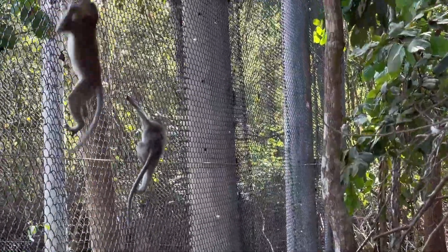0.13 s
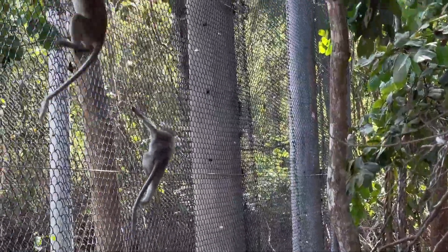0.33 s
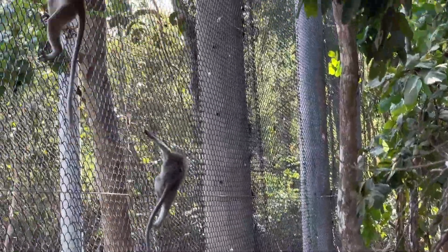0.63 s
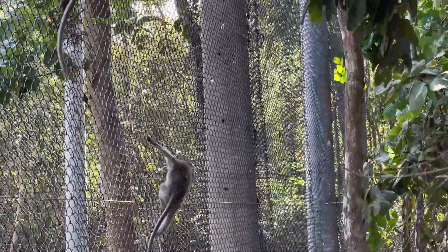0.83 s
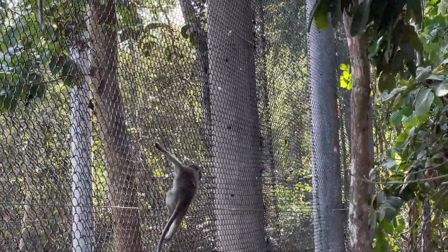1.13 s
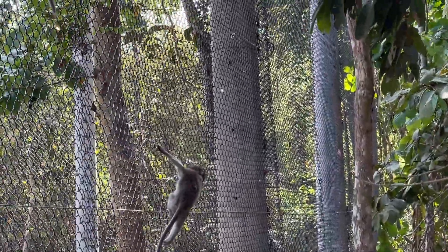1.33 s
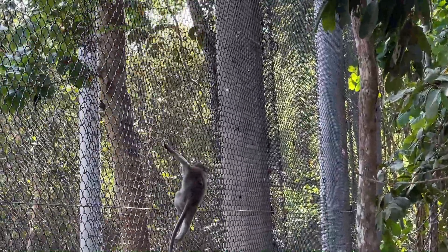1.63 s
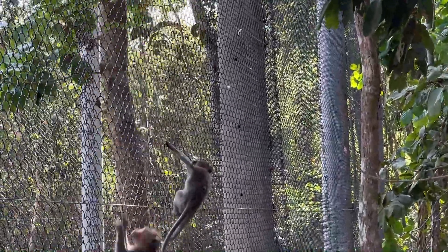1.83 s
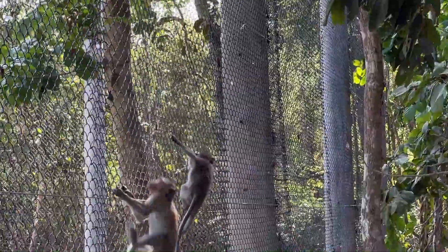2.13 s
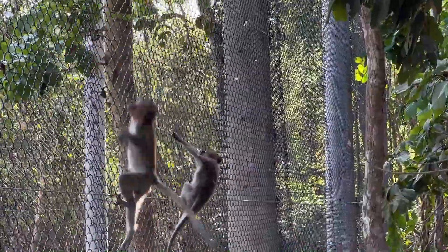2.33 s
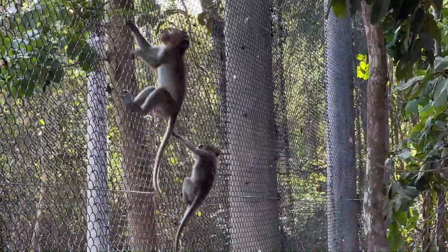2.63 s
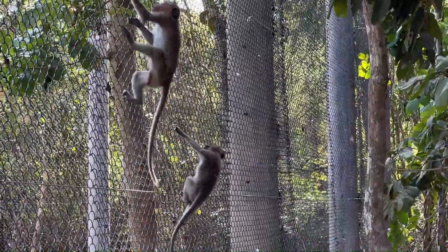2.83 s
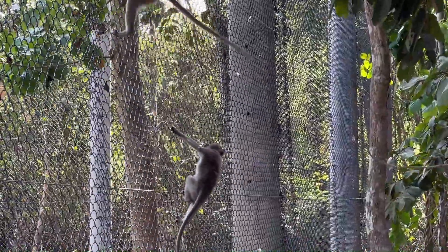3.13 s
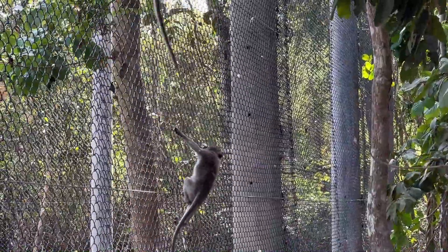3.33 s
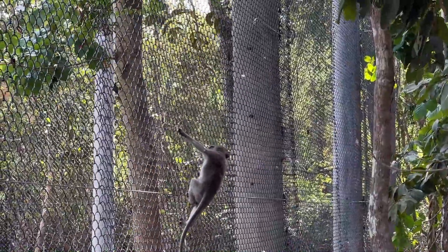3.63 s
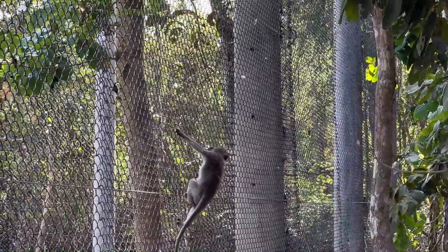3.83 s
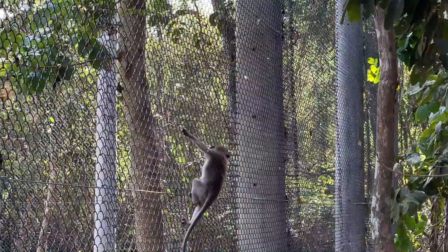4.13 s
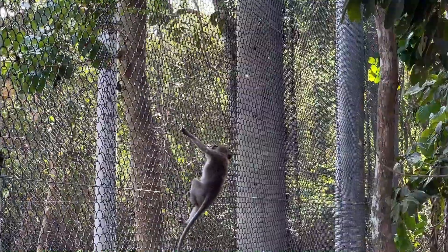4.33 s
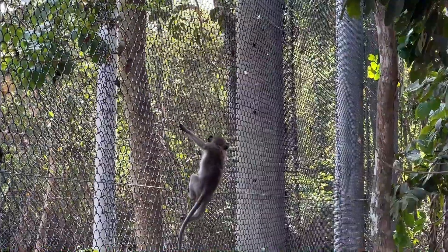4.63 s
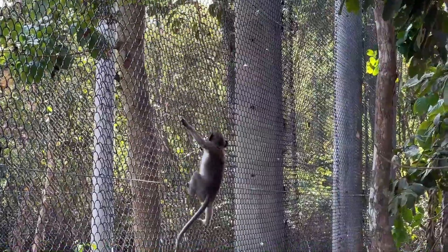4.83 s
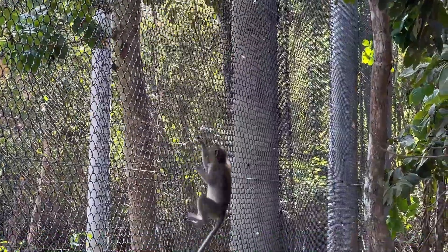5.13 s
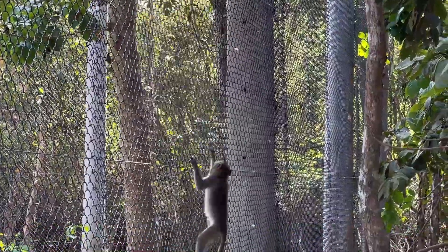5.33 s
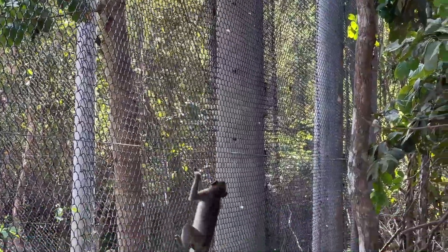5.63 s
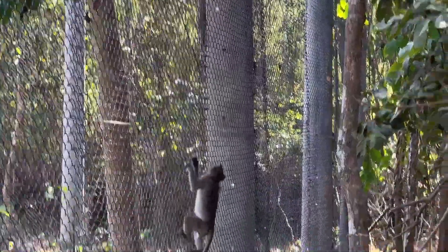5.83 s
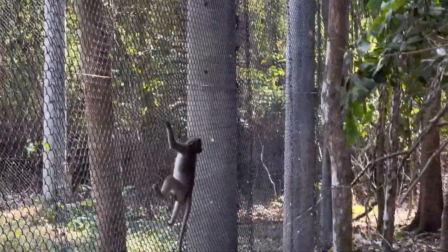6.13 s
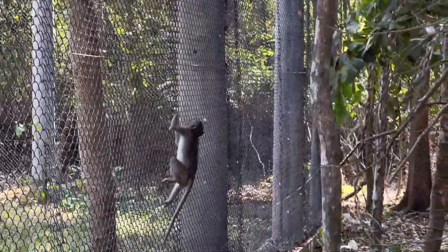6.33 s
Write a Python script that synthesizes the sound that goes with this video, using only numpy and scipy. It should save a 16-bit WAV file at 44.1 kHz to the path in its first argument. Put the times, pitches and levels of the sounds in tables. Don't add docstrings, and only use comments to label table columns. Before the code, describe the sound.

A low, steady rumble of distant traffic and machinery, with slow swelling hums, lies under everything, with faint woodland air. At 0.1 and 0.2 s two sharp, dry snaps crack out amid thin rustling; a tiny high bird chirp flickers around 0.65 s. From about 0.9 s claws scrape the wire mesh: blurred, breathy metallic squeaks, thickest between 1.4 and 2.4 s, including a lower drag that rises in pitch around 1.5 to 1.9 s. Scraping continues, swelling near 3.5 s after a bright tick at 3.3 s, while distant leaves stir softly. At 4.5 s a dull knock starts close movement: dry leaves crackle, feet thud softly, and the loudest snap hits at 5.0 s with a faint post boom following. Irregular snaps, rustles and wire squeaks, one sagging in pitch near 5.85 s, continue until about 6.4 s.

```python
import sys
import numpy as np
from scipy import signal
from scipy.fft import rfft, irfft, next_fast_len
from scipy.io import wavfile
from scipy.ndimage import uniform_filter1d

SR = 44100
rng = np.random.default_rng(int(sys.argv[2]) if len(sys.argv) > 2 else 0)


def level_to_linear(level):
    exponent = np.asarray(level, float) / 20
    return 10 ** exponent


def to_wav(sig):
    pcm = np.clip(np.atleast_2d(sig), -1, 1) * 32767
    pcm = np.round(pcm).astype(np.int16)
    wavfile.write(sys.argv[1], SR, pcm.T)


N = 285327

# frequency in Hz, level in dB per Hz.
DRONE_SPECTRUM = [(13, -58), (22, -43), (38, -10.5), (57, -4.5), (75, 1), (102, -7), (129, -6), (157, -8.5),
                  (196, -21.5), (222, -21.5), (248, -28.5), (273, -24.5), (396, -40), (600, -42.5),
                  (780, -40.5), (1320, -120)]
# time in seconds, level in dB.
DRONE_LEVEL = [
    (0, -41),
    (1.0, -40.5),
    (1.6, -41.5),
    (2.6, -40.5),
    (5.88, -40.5),
    (5.999, -44),
    (6.11, -39.5),
    (6.47, -41),
]
# peak in seconds, rise in seconds, fall in seconds,
# level in dB, frequency in Hz.
ENGINE_HUMS = [(.58, 0.97, 0.55, -54, 76.8), (1.95, .35, 0.51, -36.5, 75), (3.5, 1.617, 1.7, -43, 72.58),
               (5.3, .9, 0.72, -45, 73.23), (.9, 1.4, 0.29, -46, 130.9), (3.95, 1.6, 0.5, -44.5, 125),
               (6.0, 1.2, 1.2, -48.5, 119.1), (.6, 0.53, 0.2, -50.5, 159.1), (.88, .07, 0.42, -43, 151),
               (1.6, 0.8, 0.64, -45.5, 151), (2.1, .6, 1.0, -54.5, 224), (4.9, .5, 0.37, -47.5, 143)]
# frequency in Hz, level in dB per Hz.
AIR_SPECTRUM = [(300, 2), (600, 0), (1200, -9), (2500, -3), (6000, 0), (11500, -1), (13500, -15),
                (16000, -10)]
# time in seconds, level in dB, frequency in Hz.
CHIRP = [
    (.62, -66, 7900),
    (.635, -57, 8800),
    (.65, -54, 9450),
    (.67, -60, 9400),
    (.685, -80, 8600),
    (.705, -69, 7800),
    (.72, -78, 7700),
]

# start in seconds, peak level in dB, frequency in Hz.
FOOTFALLS = [(4.498, -43, 282), (4.785, -35, 360), (4.843, -41, 420), (4.955, -34, 356),
             (5.004, -38.5, 364), (5.07, -55, 264), (5.319, -45, 332), (5.489, -41, 393), (5.751, -44, 600),
             (6.062, -34.5, 428), (6.191, -45, 490)]
# peak in seconds, rise in seconds, fall in seconds, level in dB, frequency in Hz.
POST_BOOM = [
    (5.09, 0.17, 0.14, -49, 189),
]

# frequency in Hz, level in dB per Hz.
FAR_LEAF_SPECTRUM = [(900, -13), (1800, -3), (3000, 1), (5000, 1), (7500, -0.5), (9500, -5), (11000, -17),
                     (13000, -29)]
# frequency in Hz, level in dB per Hz.
NEAR_LEAF_SPECTRUM = [(900, -16.5), (2000, -6.5), (3500, -2.5), (5500, -3), (7500, 0.5), (9500, -1),
                      (11500, -3), (13500, -11), (16000, -8)]
# frequency in Hz, level in dB per Hz.
LITTER_SPECTRUM = [(150, -1.5), (300, 0), (500, -3), (1000, -5.5), (1800, -8.5), (3500, -29)]
# frequency in Hz, level in dB per Hz.
FIZZ_SPECTRUM = [(8500, -17), (10000, -10.5), (11500, -3.5), (13000, 2), (14300, -15), (16000, -18)]
# peak in seconds, rise in seconds, fall in seconds, level in dB, fizz of fine twigs in dB re rustle.
FAR_RUSTLES = [(.02, 0.11, 0.12, -69.5, 7), (.105, 0.047, .15, -61.5, 9), (.25, .1, 0.3, -65.5, 1.5),
               (.65, 0.063, 0.31, -74.5, 12.5), (.9, 0.28, 0.46, -75, 8), (1.25, 0.33, 2.3, -62.5, 8),
               (1.75, 0.87, 0.48, -62, 7.5), (2.1, 1.0, 1.3, -59.5, -19), (2.75, 1.0, 1.5, -57.5, -5.5),
               (3.55, 1.0, 0.35, -56.5, -1), (3.86, 0.16, 0.57, -57, -7), (4.25, 0.28, 0.77, -61, -3),
               (4.53, 0.12, 0.091, -58.5, -4)]
# peak in seconds, rise in seconds, fall in seconds, level in dB,
# body of the litter in dB re rustle.
NEAR_RUSTLES = [(4.73, 0.053, 0.054, -55, -3), (4.85, 0.16, 0.7, -47, -5), (4.95, 0.044, 0.42, -47.5, -6),
                (5.235, 0.12, 0.081, -46.5, -10), (5.33, 0.2, 0.74, -51.5, -5.5),
                (5.48, .06, 0.076, -56, 0), (5.65, 0.18, 0.62, -54.5, -11.5), (5.82, 0.29, 0.1, -57, -7),
                (6.11, 0.11, 0.36, -55, -1), (6.21, 0.24, 0.11, -49, -8.5), (6.46, 0.22, .2, -55.5, -2)]

# low edge in Hz, high edge in Hz, decay t60 in seconds, scatter in dB, crack in dB.
SNAP_KINDS = [
    (600, 3000, 0.034, -11, -3.5),
    (1210, 9300, 0.008, -16.5, -6.5),
    (4900, 12600, 0.012, -24, -5),
    (8000, 12000, 0.035, -32, -2),
]
# start in seconds, peak level in dB, ring in Hz.
DULL_SNAPS = [
    (4.493, -32.5, 2130),
    (5.492, -44, 2150),
    (5.745, -34.5, 1500),
]
# start in seconds, peak level in dB, ring in Hz, second ring in dB, second ring in Hz.
WIDE_SNAPS = [
    (0.1169, -18, 2930, -4, 8450),
    (0.2232, -18, 3860, 2, 6800),
    (4.7179, -25, 2390, -3, 8500),
    (5.004, -17.5, 3260, 0, 7050),
    (5.0744, -33, 3120, 0, 7910),
    (5.2544, -36.5, 4150, 0, 8400),
    (6.2094, -31, 2630, 0, 7400),
    (5.474, -28, 3110, -6, 6960),
    (5.7448, -29.5, 3000, 0, 4330),
    (6.1175, -32, 2230, -6, 6000),
]
# start in seconds, peak level in dB, ring in Hz.
BRIGHT_SNAPS = [(3.3, -24, 5240), (5.3, -43, 12000), (4.8459, -33, 8190), (5.1194, -29, 6150),
                (5.5104, -21, 6900), (4.7, -31, 11200), (5.5503, -37, 7200), (.0947, -35, 7400),
                (4.6583, -36, 8050), (5.2, -28, 6270), (5.789, -29, 7450), (6.058, -27, 8600),
                (6.31, -21.5, 5600), (5.7452, -27, 5500), (6.4084, -33.5, 6160)]
# start in seconds, peak level in dB, ring in Hz.
FINE_SNAPS = [
    (0.5122, -45.5, 11400),
    (0.6015, -45, 11600),
    (1.014, -38, 11100),
]

# peak in seconds, # rise
# in seconds, fall in seconds, level in dB, singing band in Hz.
THIN_WIRES = [(.86, 0.052, 0.3, -52.5, 5270), (.98, 0.14, .2, -56.5, 6430), (1.19, 0.097, 1, -53, 5900),
              (1.75, 0.91, 0.55, -53.5, 5930), (2.15, 0.11, 1, -49.5, 5570), (2.6, 0.88, .5, -55, 5260),
              (3.0, 0.28, 0.11, -46.5, 5460), (3.28, 0.21, 0.32, -49.5, 6100),
              (3.51, 0.37, 0.33, -44, 5600), (3.84, 0.072, 0.54, -53, 5140), (4.366, 0.12, 0.21, -48, 5250),
              (5.844, 1, 0.18, -53.5, 6230), (6.306, 0.0074, 0.096, -46, 5770)]
SLIDING_CLAWS = [(.861, .051, .101, -59, 4510), (1.121, .041, .18, -56, 5020), (1.32, 0.092, .1, -58, 5600),
                 (1.5, 0.3, .5, -55.5, 5820), (1.8, .15, .2, -58, 6060), (1.88, 0.12, 0.12, -51, 5000),
                 (2.4, .03, .05, -57, 4600), (2.13, 0.09, 0.23, -50.5, 5870), (2.33, .03, 0.045, -48, 6070),
                 (2.33, .04, .06, -47, 4080), (2.95, 0.22, 0.18, -52.5, 4280), (3.1, .2, .17, -52, 4450),
                 (2.9, 0.33, 0.36, -49, 5900), (6.44, .06, .11, -53, 6000)]
MID_WIRES = [(.126, 0.0078, 0.057, -53, 3000), (.25, 0.04, .22, -48.5, 3090),
             (.92, 0.034, 0.13, -48.5, 3180), (1.43, 0.038, 0.11, -47.5, 3000),
             (1.564, 0.031, 0.31, -48.5, 3010), (1.87, 0.093, 0.072, -41.5, 2900),
             (1.976, 0.081, 0.082, -49.5, 2960), (2.25, 0.23, 0.41, -49.5, 2970),
             (2.812, 0.13, 0.11, -54.5, 3000), (5.485, 0.043, .05, -51, 3150),
             (1.45, .03, 0.049, -54, 3350)]
THICK_WIRES = [(1.06, 0.02, 0.096, -58, 2350), (1.15, 0.088, 0.13, -54.5, 1980),
               (3.51, .04, 0.13, -47, 2640), (1.414, 0.047, 0.21, -51, 2380),
               (1.61, 0.079, 0.12, -49.5, 2520), (2.45, 0.62, 0.18, -50, 1920),
               (2.75, 0.6, 0.15, -55, 2097), (3.22, 0.061, 0.24, -49, 2370), (3.4, 0.33, 0.1, -50.5, 2280),
               (3.58, 0.18, 0.31, -42.5, 2360), (3.8, 0.03, 0.12, -52, 2250), (4.046, 0.1, 0.2, -51, 1950),
               (4.396, 0.19, 0.24, -50.5, 2040), (4.73, 0.028, 0.75, -51.5, 2320),
               (5.43, 0.12, 0.21, -54, 2100), (5.7, .04, 0.1, -52.5, 1920), (6.15, 0.12, 0.19, -45.5, 2290),
               (6.33, 0.11, 0.17, -59, 2280)]
SLACKENING_WIRE = [
    (5.85, 0.1, 0.19, -46, 2540),
]
CLAW_HISS = [
    (3.85, 0.068, .15, -48.5, 10100),
    (3.9, .12, 0.11, -55, 15000),
    (.14, .4, .1, -57, 15100),
    (1.03, 0.059, .05, -62, 15100),
    (1.6, .06, .06, -58, 15100),
    (3.5, .05, .15, -65, 15200),
]
LOW_WIRES = [
    (1.92, .35, 0.16, -52.5, 1520),
]
TAUT_WIRES = [
    (5.43, .1, 0.2, -46.5, 2123),
    (5.86, 0.079, .1, -52, 3300),
    (5.87, .07, 0.073, -50, 2620),
    (5.9, .09, .25, -47.5, 2210),
    (6.14, .08, 0.13, -51, 2280),
    (6.33, .1, .12, -59, 2290),
    (2.45, .12, .1, -58, 1920),
    (1.97, .06, 0.087, -52, 3000),
    (0.13, 0.022, .06, -53, 3050),
]
# time in seconds, level in dB, band in Hz.
RISING_DRAG = [
    (1.46, -62, 1341),
    (1.52, -48, 1430),
    (1.62, -50.5, 1410),
    (1.7, -49, 1550),
    (1.76, -47, 1730),
    (1.84, -48.5, 1890),
    (1.95, -50, 1830),
    (2.07, -77.5, 1870),
]

# frequency in Hz, lead of the right port in radians.
PORT_LEAD = [(1200, 0), (1900, .3), (2300, -.1), (3100, -.65), (5000, -.55), (5800, -.1), (7300, -.1),
             (7900, -.65), (8600, 0), (9300, 1.6), (10250, 3.14), (11850, 6.28), (12400, 6.5), (13100, 9.2),
             (14200, 9.6), (15200, 12.56)]
# frequency in Hz, coherence from 0 to 1.
PORT_COHERENCE = [(30, .985), (80, .98), (160, .94), (300, .85), (800, .7), (1400, .45), (2100, .91),
                  (5200, .92), (6000, .955), (8700, .955), (9500, .94), (10250, .96), (11000, .94),
                  (15000, .94)]
# frequency in Hz, left minus right in dB.
PORT_TILT = [(30, -.8), (60, -.8), (150, -1.5), (300, -.4), (700, -.5), (1500, 2.6), (2200, -.3),
             (15000, 0)]
# frequency in Hz, gain in dB.
MIC_RESPONSE = [(11400, 0.5), (12000, -7), (12700, -15.5), (13500, -33), (14200, -8.5), (16000, -12.5)]


def evened(x):
    return x / np.sqrt(np.mean(x ** 2) + 1e-20)


def read(points, hz):
    f, value = np.transpose(points)
    return np.interp(np.log(hz + 1), np.log(f + 1), value)


def columns(rows):
    s, *rest = np.transpose(rows)
    start = max(round(s[0] * SR), 0)
    end = max(min(round(s[-1] * SR), N), start + 8)
    t = np.arange(start, end) / SR
    return start, [np.interp(t, s, curve) for curve in rest]


def add(mix, start, sound):
    part = mix[start:][:len(sound)]
    part += sound[:len(part)]


def colour(x, response):
    size = next_fast_len(len(x) + 4096)
    return irfft(rfft(x, size) * response(np.fft.rfftfreq(size, 1 / SR)), size)[:len(x)]


def shaped(x, points, beyond_db=-40):
    def response(hz):
        outside = (hz < points[0][0]) | (hz > points[-1][0])
        return level_to_linear(read(points, hz) + beyond_db * outside)
    return evened(colour(x, response))


def resonate(x, hz, width_hz):
    turn = np.exp(2j * np.pi * np.cumsum(hz * np.ones(len(x))) / SR)
    r = np.exp(-np.pi * width_hz / SR)
    return 2 * (turn * signal.lfilter([1 - r], [1, -r], x / turn)).real


def wander(size, span):
    once = uniform_filter1d(rng.standard_normal(size), span)
    return evened(uniform_filter1d(once, span))


def crackle(size, per_s, spread_db, share):
    sizes = level_to_linear(spread_db * np.minimum(rng.exponential(1, size), 2.6))
    ticks = sizes * (rng.random(size) < per_s / SR)
    ticks = signal.lfilter([1], [1, -.85], ticks) * rng.standard_normal(size)
    share = np.clip(share, 0, 1)
    return np.sqrt(1 - share) * rng.standard_normal(size) + np.sqrt(share) * evened(ticks)


def patchy(x, patchy_db, size, bins, frames):
    overlap = size * 3 // 4
    z = signal.stft(x, nperseg=size, noverlap=overlap)[2]
    patches = uniform_filter1d(rng.standard_normal(z.shape), bins, 0)
    patches = evened(uniform_filter1d(patches, frames, 1))
    out = signal.istft(z * level_to_linear(patchy_db * patches), nperseg=size, noverlap=overlap)[1][:len(x)]
    return np.sqrt(np.mean(x ** 2)) * evened(out)


def swell_db(t, s, rise, fall, roundness):
    distance = np.where(t < s, (s - t) / max(rise, .002), (t - s) / max(fall, .002))
    return -20 * distance ** roundness


def strokes(rows, glide, roundness):
    reach = np.linspace(0, 1.25, 15)
    tables = []
    for s, rise, fall, db, hz in rows:
        t = np.r_[s - rise * reach[:0:-1], s + fall * reach]
        level = db + swell_db(t, s, rise, fall, roundness)
        tables.append(np.transpose([t, level, hz * (1 + glide * (t - s))]))
    return tables


def stirred(rows):
    t = np.arange(0, N + 64, 64) / SR
    power = np.array([level_to_linear(2 * (db + swell_db(t, s, rise, fall, 1.37))) for s, rise, fall, db, _ in rows])
    companion = level_to_linear(2 * np.array(rows)[:, -1]) @ power
    return [np.interp(np.arange(N) / SR, t, p) for p in (power.sum(0), companion)]


def drone():
    trim_db = -1.0
    db = np.interp(np.arange(N) / SR, *np.transpose(DRONE_LEVEL))
    out = level_to_linear(db + trim_db) * shaped(rng.standard_normal(N), DRONE_SPECTRUM)
    waver = 1 + 0.01205 * wander(N, 6000)
    for rows in strokes(ENGINE_HUMS, glide=0, roundness=2.1):
        start, (db, hz) = columns(rows)
        phase = 2 * np.pi * np.cumsum(hz * waver[start:][:len(hz)]) / SR
        add(out, start, level_to_linear(db + trim_db) * np.sin(phase))
    return out


def moving_air():
    return level_to_linear(-60.5) * shaped(rng.standard_normal(N), AIR_SPECTRUM)


def bird():
    start, (db, hz) = columns(CHIRP)
    out = np.zeros(N)
    add(out, start, level_to_linear(db) * evened(resonate(rng.standard_normal(len(db)), hz, 160)))
    return out


def thuds():
    out, t = np.zeros(N), np.arange(3000) / SR
    for s, db, hz in FOOTFALLS:
        envelope = level_to_linear(db - 60 * t / 0.043) * (1 - np.exp(-t / 0.0048))
        add(out, round(s * SR), 1.18 * envelope * np.sin(2 * np.pi * hz * t))
    return out


def leaves():
    still_db, far_body_db, near_fizz_db = -81, -66.5, -7
    far, far_fizz = stirred(FAR_RUSTLES)
    close, close_body = stirred(NEAR_RUSTLES)
    far = far + level_to_linear(2 * still_db)
    near = close / (far + close)
    gusts = level_to_linear((.7 + .5 * near) * wander(N, 500))
    drive = crackle(N, per_s=2600, spread_db=2.7, share=.1 + .42 * near)
    drive = patchy(drive, 1.6, 256, 12, 14)
    leaf = np.sqrt(far) * level_to_linear(8.0) * shaped(drive, FAR_LEAF_SPECTRUM)
    leaf += np.sqrt(close) * level_to_linear(6.5) * shaped(drive, NEAR_LEAF_SPECTRUM)
    body = np.sqrt(close_body + level_to_linear(2 * far_body_db)) * level_to_linear(1.5) * shaped(drive, LITTER_SPECTRUM)
    fizz = np.sqrt(far_fizz + close * level_to_linear(2 * near_fizz_db)) * level_to_linear(5.5) * shaped(drive, FIZZ_SPECTRUM)
    return (leaf + body + fizz) * gusts


def snaps():
    out, t = np.zeros(N), np.arange(9000) / SR
    events = (DULL_SNAPS, WIDE_SNAPS, BRIGHT_SNAPS, FINE_SNAPS)
    for rows, (low_hz, high_hz, t60, scatter_db, crack_db) in zip(events, SNAP_KINDS):
        band = signal.butter(3, [low_hz, high_hz], "band", fs=SR)
        decay = level_to_linear(-60 * t / t60)
        burst = decay + level_to_linear(scatter_db - 60 * t / 0.29)
        for s, db, *rings in rows:
            tick = signal.lfilter(*band, rng.standard_normal(len(t)) * burst + 4 * (t == 0))
            pairs = np.reshape([0] + rings, (-1, 2))
            core = sum(level_to_linear(up) * np.sin(2 * np.pi * hz * t) for up, hz in pairs)
            core *= decay * (1 - np.exp(-t / 0.00051))
            sound = 0.43 * core + level_to_linear(crack_db) * tick / abs(tick).max()
            add(out, round((s + 0.00062) * SR), level_to_linear(db) * sound)
    return out


def scraped(tables, width_hz, tremble, trim_db):
    out = np.zeros(N)
    ticks = crackle(N, per_s=900, spread_db=3.0, share=.15)
    shake = wander(N, 250)
    for rows in tables:
        start, (db, hz) = columns(rows)
        drive = ticks[start:][:len(db)]
        hz = hz * (1 + tremble * shake[start:][:len(db)])
        skirt = resonate(drive, hz, 3 * width_hz)
        peak = evened(resonate(skirt, hz, width_hz))
        band = evened(peak + .3 * evened(resonate(skirt, hz, 3 * width_hz)))
        band = evened(band / (uniform_filter1d(band ** 2, 900) + .1) ** .3)
        add(out, start, level_to_linear(db + trim_db) * band)
    return out


def drawn(rows, glide=0):
    return strokes(rows, glide, roundness=1.2)


def post():
    return scraped(drawn(POST_BOOM), 25, 0.017, 0)


def wire_mesh():
    thick = drawn(THICK_WIRES, -0.16) + drawn(SLACKENING_WIRE, -1.23)
    low = drawn(LOW_WIRES) + [RISING_DRAG]
    wires = scraped(drawn(THIN_WIRES, 0.023), width_hz=1350, tremble=0.015, trim_db=-1.75)
    wires += scraped(drawn(SLIDING_CLAWS, .13), width_hz=220, tremble=0.017, trim_db=-1.4)
    wires += scraped(drawn(MID_WIRES, -0.039), width_hz=350, tremble=0.024, trim_db=-1.8)
    wires += scraped(thick, width_hz=263, tremble=0.018, trim_db=-2.25)
    wires += scraped(drawn(CLAW_HISS), width_hz=500, tremble=0.019, trim_db=-1.3)
    wires += scraped(low, width_hz=175, tremble=0.015, trim_db=-2.6)
    wires += scraped(drawn(TAUT_WIRES, -.05), width_hz=115, tremble=.008, trim_db=-1.6)
    return wires


def ports(x):
    t = np.arange(SR) / SR
    scatter = rng.standard_normal(len(t)) * level_to_linear(-60 * t / .7)
    size = next_fast_len(N + SR)
    hz = np.fft.rfftfreq(size, 1 / SR)
    same = np.clip(read(PORT_COHERENCE, hz), -1, 1)
    side = np.array([[-1], [1]])
    scattered = rfft(scatter / np.linalg.norm(scatter), size)
    paths = np.sqrt((1 + same) / 2) + side * np.sqrt((1 - same) / 2) * scattered
    port = np.exp(.5j * side * read(PORT_LEAD, hz)) * level_to_linear(-side * read(PORT_TILT, hz) / 2)
    return irfft(rfft(x, size) * paths * port, size)[:, :N]


def thinned(x, floor_db, follow, gap_db):
    hz, t, z = signal.stft(np.array([x[0] + x[1], x[0] - x[1]]) / 2, SR, nperseg=1024)
    power = uniform_filter1d(uniform_filter1d(abs(z) ** 2, size=9, axis=1), size=3, axis=2)
    band_db = 10 * np.log10(power + 1e-20)
    loud_db = 10 * np.log10((abs(z[:, 40:280]) ** 2).mean((0, 1)) + 1e-20)
    blocks = np.kron(rng.standard_normal((65, len(t) // 4 + 1)), np.ones((8, 4)))
    floor_db = floor_db + 1.5 * blocks[:len(hz), :len(t)]
    above_floor = band_db > floor_db + follow * (loud_db - np.median(loud_db))
    keep = above_floor & (band_db > band_db[::-1] - gap_db)
    keep = (keep | (hz < 1800)[:, None]) & (hz < 15800)[:, None]
    mid, side = signal.istft(z * keep, SR, nperseg=1024)[1][:, :N]
    return np.array([mid + side, mid - side])


def scene():
    background = drone() + bird()
    impacts = thuds() + post() + snaps()
    rustle = patchy(leaves() + moving_air(), 2.4, 1024, 2, 14)
    wires = patchy(wire_mesh(), 1.1, 1024, 2, 10)
    return ports(background + impacts + rustle + wires)


def top_cut(x):
    return signal.sosfilt(signal.butter(12, 17070, fs=SR, output="sos"), x)


def record(dry):
    heard = np.array([colour(x, lambda hz: level_to_linear(read(MIC_RESPONSE, hz))) for x in dry])
    finished = thinned(heard, floor_db=-94.0, follow=.4, gap_db=13.0)
    return top_cut(finished)


dry = scene()
out = record(dry)
to_wav(out)
```